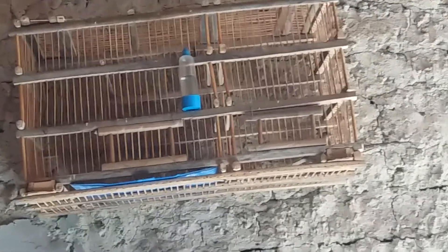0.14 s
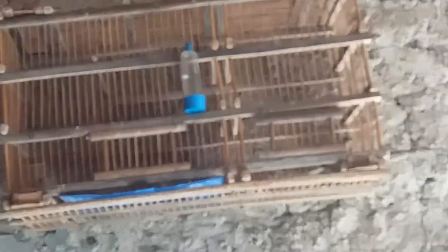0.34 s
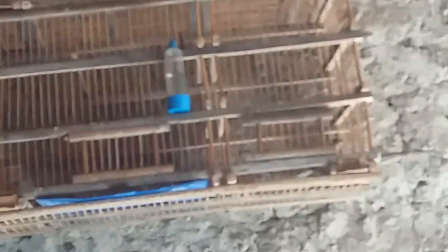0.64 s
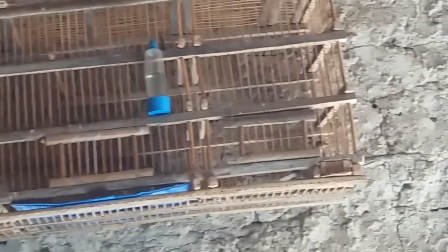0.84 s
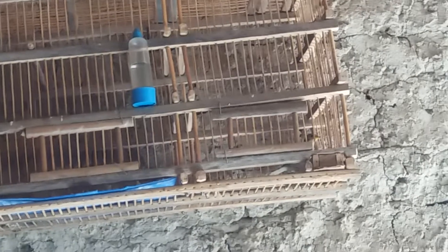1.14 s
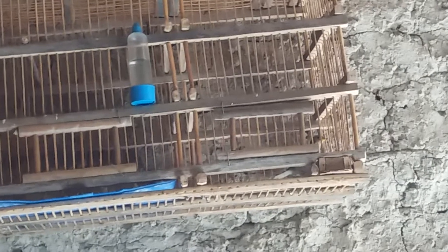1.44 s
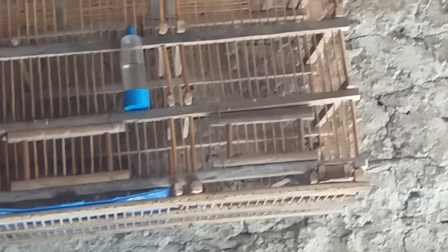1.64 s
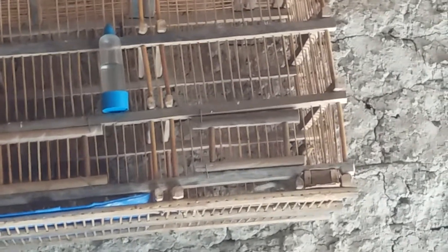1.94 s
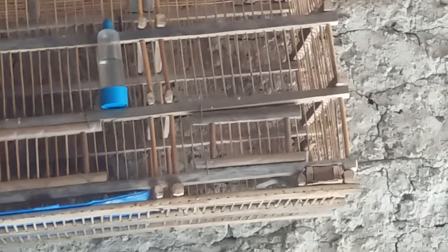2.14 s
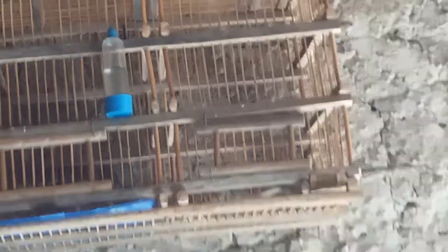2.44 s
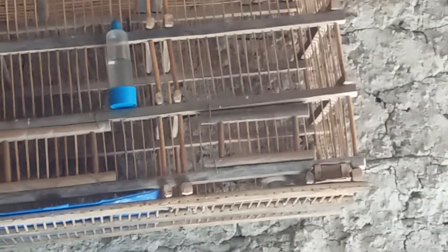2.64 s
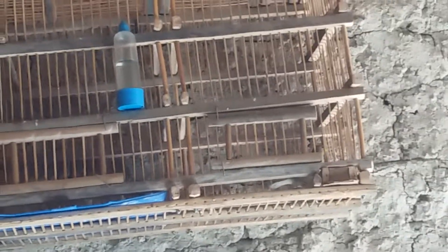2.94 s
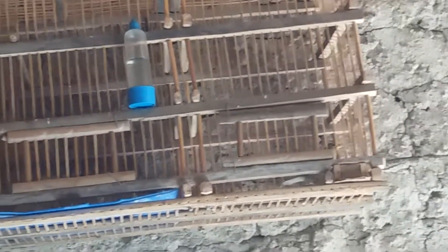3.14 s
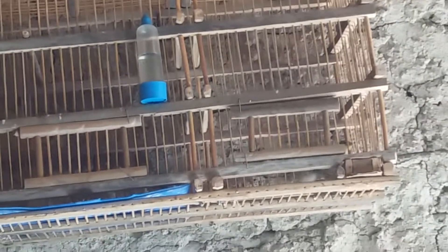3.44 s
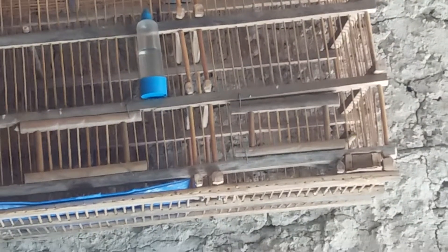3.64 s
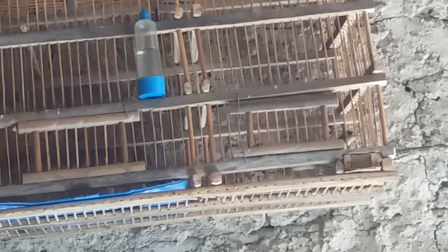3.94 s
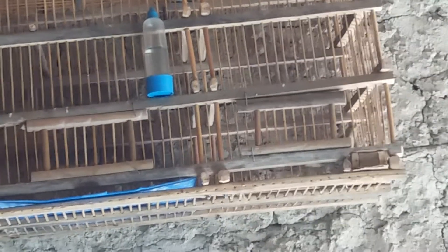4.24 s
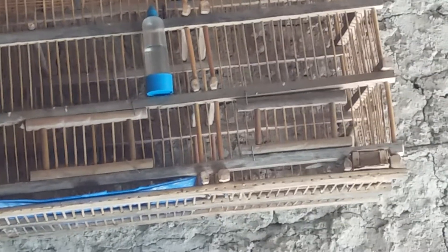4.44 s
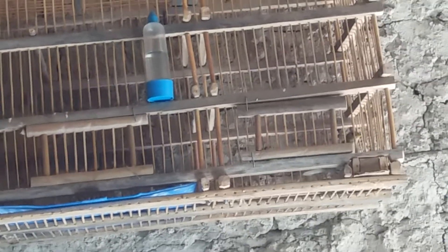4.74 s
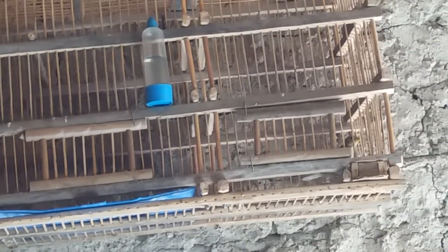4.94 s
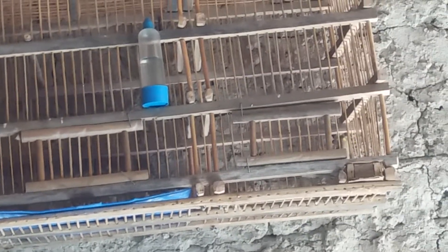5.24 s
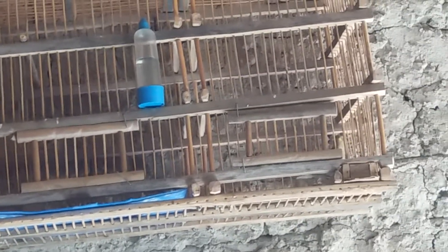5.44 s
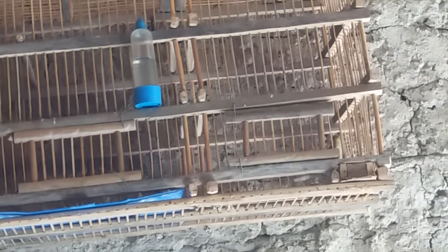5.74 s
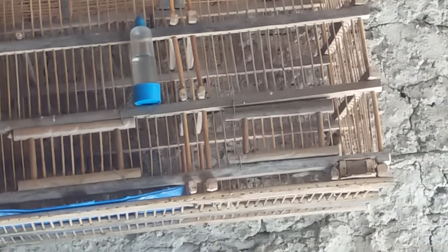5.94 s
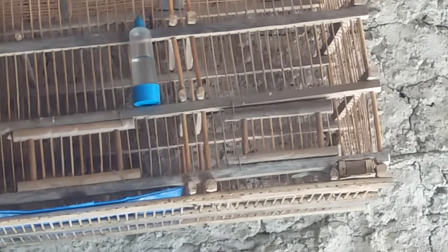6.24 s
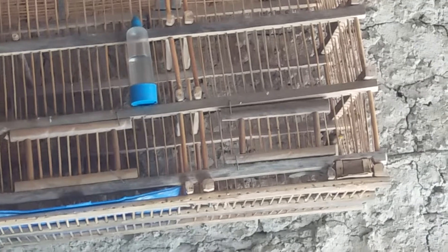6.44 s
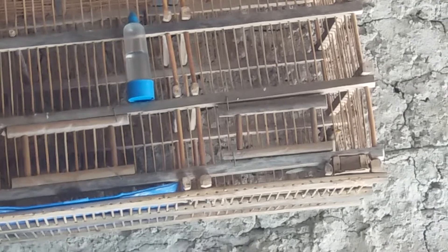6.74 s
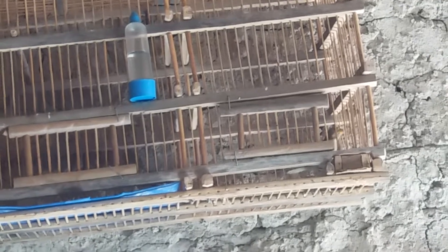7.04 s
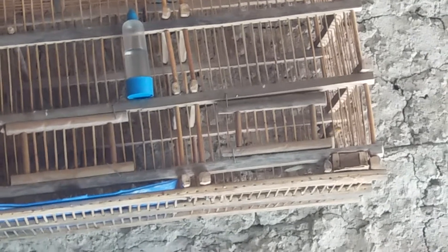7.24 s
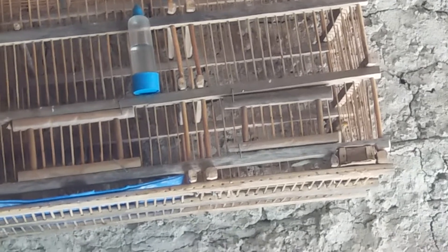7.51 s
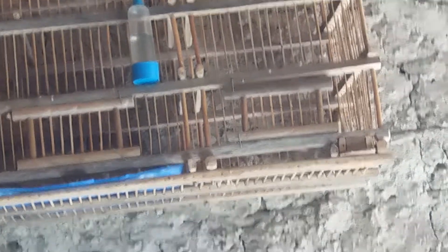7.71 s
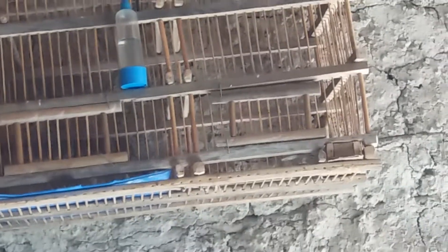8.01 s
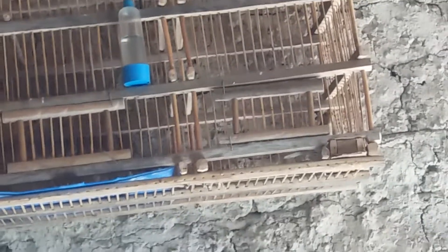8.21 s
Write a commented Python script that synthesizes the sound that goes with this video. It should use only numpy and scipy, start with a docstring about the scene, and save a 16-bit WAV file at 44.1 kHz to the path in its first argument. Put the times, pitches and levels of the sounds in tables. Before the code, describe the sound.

Scattered chirps and light perch ticks build into busy, high twittering from small birds in a wooden cage outdoors.

```python
"""Caged birds twittering

Small birds chip, whistle, then break into overlapping runs of fast twittering. Notes are gliding tones
shaken by a hoarse throat; rasps are clicks ringing its resonances. Cage bars and hard walls smear every
note. Perches tick, a hand bumps the camera, and far chatter, outdoor air and a faint hum lie below."""
import sys
import numpy as np
from scipy import signal
from scipy.fft import rfft, irfft
from scipy.io import wavfile
from scipy.ndimage import uniform_filter1d

SR = 44100
rng = np.random.default_rng(int(sys.argv[2]) if len(sys.argv) > 2 else 0)


def log_audio(samples):
    """Write samples as a 16-bit WAV file to the path given in sys.argv[1]."""
    # one column per channel
    frames = np.atleast_2d(samples).T
    # limit to full scale, then quantise
    limited = np.clip(frames, -1, 1)
    pcm = np.round(limited * 32767).astype(np.int16)
    wavfile.write(sys.argv[1], SR, pcm)


N = 369116


def note(length_s, db, pitches_hz, octave_db=-33, hoarse=0.13):
    """A tone glides through its pitches; a hoarse throat (0-1) shakes pitch and level."""
    n = max(round(length_s * SR), 64)
    knots = len(pitches_hz)
    hz = np.interp(np.linspace(0, knots - 1, n), range(knots), pitches_hz)
    hz = uniform_filter1d(hz, n // (2 * knots), mode="nearest")
    jitter = uniform_filter1d(uniform_filter1d(rng.standard_normal((2, SR // 3)), 30), 30)
    wobble, shimmer = (unit_rms(row)[:n] for row in jitter)
    hz = hz + 700 * hoarse * wobble
    cycles = np.cumsum(hz) / SR
    k = np.arange(1, 9)[:, None]
    rolloff_db = (min(octave_db, 0) - 2) * np.maximum(k - 2, 0) - 7 * (k > 2)
    partial_db = octave_db * (k > 1) + rolloff_db
    # a clear throat damps strong overtones above 6 kHz, a hoarse one passes them
    octaves_over = np.maximum(np.log2(k * abs(hz) / 6000 + 1e-9), 0)
    damp_db = 60 * (1 - hoarse) ** 4 * (octave_db > -20) * (k > 1) * octaves_over
    amps = gain_of(partial_db - damp_db) * np.clip((19000 - k * hz) / 3000, 0, 1)
    partials = (amps * np.sin(2 * np.pi * k * cycles)).sum(0)
    # below 6 kHz alternate cycles differ: a faint line an octave down
    sub = gain_of(-23.5) * np.clip((6000 - hz) / 800, 0, 1) * np.sin(np.pi * cycles + wobble)
    breath = gain_of(-21.5) * uniform_filter1d(rng.standard_normal(SR // 3), 3)[:n]
    flutter = gain_of(8 * min(hoarse, 0.5) * shimmer)
    envelope = signal.windows.tukey(n, min(0.5, 0.034 / length_s))
    return gain_of(db) * (partials + sub + breath) * flutter * envelope


def syllables(rows, path, end_db=-8, **voice):
    """Notes on one evenly timed pitch path; the lower it ends, the more of end_db they reach."""
    out = np.zeros(N)
    for start_s, length_s, db, low_hz, high_hz, *octave_db in rows:
        sound = note(length_s, db, low_hz + (high_hz - low_hz) * np.array(path), *octave_db, **voice)
        ramp_db = end_db * (1 - path[-1]) * np.linspace(0, 1, len(sound)) ** 2
        add(out, start_s, sound * gain_of(ramp_db))
    return out


def slurs():
    """Rough falling notes: hooks flick up first; a second voice holds near the top of each fall."""
    # (start [s], length [s], level [dB], low [Hz], high [Hz])
    falls = [(1.029, 0.12, -64, 3470, 3950), (4.853, 0.026, -34.5, 1327, 5710),
             (4.998, 0.11, -47, 1640, 3450), (5.738, 0.033, -28.5, 3300, 4196),
             (5.853, 0.068, -30, 2314, 5500), (5.988, .06, -34.5, 1436, 2820),
             (6.046, 0.045, -24.5, 3500, 5480), (6.282, 0.081, -24, 2493, 5140),
             (6.344, 0.038, -42, 1190, 3100), (6.698, .035, -24.5, 2350, 4310),
             (6.756, 0.076, -26, 2273, 5245), (7.144, 0.055, -23.5, 3255, 4890),
             (7.223, 0.055, -23, 2830, 4485), (8.087, .03, -53, 6800, 8300),
             (8.282, 0.0503, -24.5, 3124, 4310)]
    hooks = [(5.199, 0.058, -37.5, 4370, 5410), (5.95, 0.047, -28, 2460, 5210),
             (6.189, 0.053, -22.5, 3060, 4830), (6.387, 0.057, -21, 2510, 5240),
             (7.363, 0.035, -28.5, 3030, 3927)]
    # paths (pitch [0 low, 1 high])
    fall = [1, .56, .34, .15, 0]
    hook = [0.73, 0.92, 0.3, 0]
    sag = [1, 0.78, .86]
    second_voice = [(start_s, 0.53 * length_s, db - 5.5, *hz) for start_s, length_s, db, *hz in falls]
    kinds = [(falls, fall), (hooks, hook), (second_voice, sag)]
    return sum(syllables(rows, path, octave_db=-25.5, hoarse=0.28) for rows, path in kinds)


def twitters():
    """Clearer, mostly high notes in six pitch shapes."""
    # (start [s], length [s], level [dB], low [Hz], high [Hz])
    cascades = [(5.935, 0.097, -29, 1814, 8220), (7.257, 0.1, -27, 1786, 8460),
                (7.462, 0.085, -22, 2650, 8220)]  # tumble in two steps
    chips = [(.927, 0.023, -40, 3220, 9200), (3.177, 0.018, -28.5, 4500, 10300),
             (4.359, 0.019, -25, 4210, 10760), (6.229, 0.022, -33.5, 6830, 10450),
             (6.514, 0.027, -30, 5800, 10840), (8.342, 0.017, -34.5, 9000, 10330)]  # rise sharply
    climbs = [(2.383, 0.14, -67.5, 2180, 3810), (5.058, 0.055, -37.5, 2840, 4700),
              (5.727, .028, -30, 3400, 10600), (6.153, 0.037, -39, 7100, 9660),
              (6.473, 0.053, -31.5, 1700, 6490), (7.24, 0.039, -40, 1164, 2660),
              (7.901, 0.039, -35.5, 3166, 4490), (8.248, 0.047, -37.5, 4970, 7370),
              (8.252, 0.058, -42, 5800, 10240)]  # rise ever more slowly
    arches = [(5.927, 0.041, -33, 7200, 10630), (6.681, 0.037, -30.5, 5300, 11070),
              (6.879, 0.053, -26, 3120, 3690), (7.258, 0.033, -33, 5800, 9450),
              (7.457, .035, -34, 6300, 10700), (7.87, 0.057, -32, 2497, 3400)]  # jump, then sag
    dips = [(5.055, 0.075, -40, 5580, 6590), (5.21, 0.051, -33.5, 6220, 7370),
            (8.103, 0.04, -36, 5900, 7200)]  # drop and return
    waves = [(4.778, 0.055, -36, 5120, 7850), (5.743, 0.091, -31.5, 5980, 10600),
             (6.148, .1, -26.5, 6080, 8020), (6.69, 0.094, -26, 5510, 11940)]  # waver, then shoot up
    # paths (pitch [0 low, 1 high])
    cascade = [1, 1, .88, 0.66, .69, 0.32, 0.013, 0.064]
    chip = [0, .45, .56, 1]
    climb = [0, .55, .8, 1]
    arch = [0, 0.93, 0.35]
    dip = [0.95, 0, 1]
    wave = [0, 0.37, .1, 0, .4, 1]
    kinds = [(cascades, cascade), (chips, chip), (climbs, climb),
             (arches, arch), (dips, dip), (waves, wave)]
    return sum(syllables(rows, path, octave_db=-21, hoarse=0.18) for rows, path in kinds)


def swoops():
    """Wide sweeps rich in overtones: up, down and up again."""
    # (start [s], length [s], level [dB], low [Hz], high [Hz])
    sweeps = [(4.717, .125, -36.5, 1773, 5640)]
    loops = [(6.903, .185, -29.5, 1200, 9500)]
    # paths (pitch [0 low, 1 high])
    sweep = [0.0544, 0.091, .22, 0.53, 1, 0.94, 0.132, 0.81]
    loop = [0, .066, .096, .125, .22, .49, .4, .14, .12, .17, .42, .7, 1]
    return syllables(sweeps, sweep, octave_db=-2.5) + syllables(loops, loop, octave_db=-2.5)


def whistles():
    """Near-sine tones of almost level pitch, and a far one that slides down and swells."""
    # (start [s], length [s], level [dB], first [Hz], last [Hz])
    level_notes = [(3.357, 0.19, -50.5, 7660, 7680), (3.367, 0.17, -54, 8860, 9040),
                   (3.374, 0.064, -59, 6800, 7100), (4.961, 0.13, -49.5, 5380, 4950),
                   (5.087, 0.032, -44, 7640, 7960), (5.421, 0.017, -31, 6730, 6740),
                   (5.545, 0.03, -39.5, 3950, 3850), (7.016, 0.017, -29, 4770, 4450),
                   (6.097, 0.085, -33, 3120, 3276), (6.513, 0.037, -31.5, 6810, 6950),
                   (6.557, 0.041, -29.5, 3804, 3780), (7.023, 0.038, -26.5, 3850, 3660),
                   (7.157, 0.0093, -29.5, 5250, 4910), (8.119, 0.12, -26.5, 5124, 4450)]
    # (start [s], length [s], level [dB], low [Hz], high [Hz])
    glides = [(3.96, .275, -63, 2740, 4660)]
    # path (pitch [0 low, 1 high])
    glide = [.9, 1, .76, 0.29, 0.27, 0.021, 0.037]
    out = syllables(glides, glide, end_db=4, hoarse=0.14)
    for start_s, length_s, db, *pitches_hz in level_notes:
        add(out, start_s, note(length_s, db, pitches_hz))
    return out


def calls():
    """Hoarse falling scolds and held or rising calls; the octave may outweigh the fundamental."""
    # (start [s], length [s], level [dB], low [Hz], high [Hz], octave [dB re fundamental])
    scolds = [(1.995, 0.06, -37.5, 1637, 2240, 7), (4.241, .04, -42.5, 1560, 2350, 10.5),
              (4.655, 0.029, -37.5, 1260, 4610, 0.5), (5.679, 0.098, -35.5, 2940, 3324, -13),
              (6.585, 0.1, -26.5, 1540, 4630, -19), (7.082, 0.045, -29, 1515, 5240, -14),
              (7.493, 0.074, -43.5, 1320, 2530, -6), (7.668, 0.073, -39, 1108, 2374, 5), ]
    # path (pitch [0 low, 1 high])
    scold = [0.95, 0.96, 0.42, 0]
    # (start [s], length [s], level [dB], first [Hz], last [Hz], octave [dB], hoarseness [0-1])
    held = [(.0, 0.056, -60, 2620, 2586, 0.5, 0.23), (0.174, 0.089, -40, 2177, 2057, -35, 0.11),
            (1.742, 0.099, -58.5, 2484, 2503, 1, 0.78), (3.603, 0.11, -62, 2405, 2480, -6.5, 0.47),
            (7.387, 0.19, -41, 1914, 2012, 8.5, 0.27), (7.763, 0.1, -36, 1504, 2554, 6.5, 0.1)]
    out = syllables(scolds, scold, hoarse=0.316)
    for start_s, length_s, db, first_hz, last_hz, octave_db, hoarse in held:
        add(out, start_s, note(length_s, db, [first_hz, last_hz], octave_db, hoarse))
    return out


def rasps():
    """Uneven clicks ring a sliding throat resonance and two steady ones."""
    # (start [s], length [s], level [dB], first resonance [Hz], last resonance [Hz])
    buzzes = [(5.318, 0.092, -39.5, 3350, 4360), (5.421, 0.105, -36, 4800, 3760),
              (5.564, 0.059, -35.5, 4640, 3720)]
    clicks_per_s, width_hz = 1100, 2700
    radius = np.exp(-np.pi * width_hz / SR)
    poles = np.convolve([1, -radius], [1, -radius])
    soften = signal.butter(2, 9000, fs=SR, output="sos")
    out = np.zeros(N)
    for start_s, length_s, db, first_hz, last_hz in buzzes:
        n = round(length_s * SR)
        chance, size, sign = rng.random((3, SR // 4))[:, :n]
        heights = gain_of(-4 * np.log(size + 0.0093)) * np.sign(sign - 0.5)
        clicks = signal.sosfilt(soften, (chance < clicks_per_s / SR) * heights)
        carrier = np.exp(2j * np.pi * np.cumsum(np.linspace(first_hz, last_hz, n)) / SR)
        throat = unit_rms((carrier * signal.lfilter([1], poles, clicks / carrier)).real)
        high = gain_of(-2) * unit_rms(resonate_twice(clicks, 8120, width_hz))
        low = gain_of(-3.5) * unit_rms(resonate_twice(clicks, 2070, width_hz))
        add(out, start_s, gain_of(db) * signal.windows.tukey(n, 0.5) * (high + low - throat))
    return out


def nasal_call():
    """Equal harmonics 3-7 of a low pitch pass through one resonance."""
    # (start [s], length [s], level [dB], first [Hz], last [Hz], resonance [Hz], width [Hz])
    nasals = [(0.111, 0.086, -47.5, 619, 592.6, 2350, 1600)]
    out = np.zeros(N)
    for start_s, length_s, db, first_hz, last_hz, nose_hz, width_hz in nasals:
        n = round(length_s * SR)
        cycles = np.cumsum(np.linspace(first_hz, last_hz, n)) / SR
        stack = np.sin(2 * np.pi * np.arange(3, 8)[:, None] * cycles).sum(0)
        tone = resonate_twice(stack, nose_hz, width_hz)
        add(out, start_s, gain_of(db) * signal.windows.tukey(n, 0.5) * tone)
    return out


def perches():
    """Claws and beaks tick: a few milliseconds of noise in a broad wooden resonance."""
    # (time [s], peak [dB], centre [Hz])
    ticks = [(0.136, -45.5, 4960), (0.6245, -37.5, 3570), (1.152, -45.5, 3700), (1.263, -49, 4970),
             (1.647, -47.5, 3420), (1.853, -41, 3520), (2.2724, -44, 3600), (2.679, -45, 4200),
             (2.84, -54.5, 4870), (3.035, -43.5, 2580), (3.7348, -41, 3700), (4.557, -34, 4070),
             (4.582, -46, 4470), (5.1857, -32, 3900)]
    out, t = np.zeros(N), np.arange(600) / SR
    for start_s, db, hz in ticks:
        snap = rng.standard_normal(len(t)) * np.exp(-t / 0.0039)
        tick = resonate_twice(snap, hz, width_hz=2600) + 0.0095 * snap
        add(out, start_s, gain_of(db) * tick / abs(tick).max())
    return out


def bumps():
    """A hand knocks the camera; its body swings a cycle or two, falling in pitch."""
    # (time [s], level [dB])
    knocks = [(0.972, -42.5), (7.864, -31.5), (7.9, -35.5), (7.971, -38)]
    out, t = np.zeros(N), np.arange(1600) / SR
    cycles = 110 * t + 0.3 * (1 - np.exp(-t / 0.001))
    swing = np.sin(2 * np.pi * cycles) * np.exp(-t / 0.005)
    for start_s, db in knocks:
        add(out, start_s, gain_of(db) * swing)
    return out


def far_chatter():
    """Distant birds: short hoarse glides at random."""
    out = np.zeros(N)
    for when, pitch, glide, size in rng.random((160, 4)):
        first_hz = 2000 + 3400 * pitch
        last_hz = first_hz * (0.78 + 0.4 * glide)
        chirp = note(0.056, -73 + 7 * size, [first_hz, last_hz], octave_db=-31, hoarse=0.2)
        add(out, when * N / SR, chirp)
    return out


def air():
    """Outdoor wash with drifting patches and two fuzzy hum lines, all slowly swelling."""
    # wash spectrum (frequency [Hz], relative density [dB])
    spectrum = [(29, -32), (50, -4), (103, -1), (245, -5), (312, -2.5), (436, -3), (480, -3.5), (836, -14),
                (3140, -17), (5080, -26), (7120, -34), (15800, -34)]
    # (time [s], relative level [dB])
    swell = [(0.0, -63.5), (8.37, -58.5)]
    # (frequency [Hz], width [Hz], relative level [dB])
    hum_lines = [(314.4, 6.3, -73.5), (491, 5.6, -71.5)]
    frames, bins_hz = N // 256 + 5, np.fft.rfftfreq(1024, 1 / SR)
    real, imag, patches = rng.standard_normal((frames, 513, 3)).T
    patches_db = 1.6 * unit_rms(uniform_filter1d(uniform_filter1d(patches, 10, 0), 14, 1))
    bins = (real + 1j * imag) * gain_of(curve_at(spectrum, bins_hz)[:, None] + patches_db)
    wash = unit_rms(signal.istft(bins, nperseg=1024, noverlap=768)[1][:N])
    noise = rng.standard_normal(N)
    hum = sum(gain_of(db + 61) * unit_rms(resonate_twice(noise, hz, width_hz))
              for hz, width_hz, db in hum_lines)
    level_db = np.interp(np.arange(N) / SR, *np.transpose(swell)) + 2.5
    return gain_of(level_db) * (wash + hum)


def coloured(x):
    """What beak, cage and microphone pass of a song."""
    # (frequency [Hz], gain [dB])
    response = [(900, -53), (1300, -6), (2100, -5.5), (2700, -1), (3250, 3), (3550, 2), (3900, 4),
                (4500, -0.5), (4950, 3), (5700, -1.5), (6600, -3), (8500, -7), (10500, -7), (16000, -11.5)]
    return irfft(rfft(x) * gain_of(curve_at(response, np.fft.rfftfreq(N, 1 / SR))), N)


def bars(x):
    """Cage bars scatter the direct sound over a few milliseconds."""
    taps = 0.8 * rng.standard_normal(400) * (rng.random(400) < 0.08) * np.exp(-np.arange(400) / 170)
    taps[0] = 1
    return signal.fftconvolve(x, taps / np.linalg.norm(taps))[:N]


def walls(x):
    """Dense echoes whose treble dies first, plus lingering cage tones."""
    # (frequency [Hz], 60 dB decay time [s])
    decay = [(2000, 0.67), (5000, 0.37), (10000, 0.21)]
    # (frequency [Hz], width [Hz], gain [dB])
    cage_modes = [(3220, 9.8, 8.5), (3830, 10.7, 11), (4143, 39, 1)]
    taps = np.zeros(SR // 2)
    slots = np.arange(120, len(taps) - 20, 20)
    taps[slots + rng.integers(0, 20, len(slots))] = rng.choice([-1., 1.], len(slots))
    bins_hz, t, bins = signal.stft(taps, SR, nperseg=128)
    drop_db = -10 / (1 + np.exp((0.06 - t) / 0.027))  # weaker beyond the near walls, 60 ms on
    decay_db = -60 * t / curve_at(decay, bins_hz)[:, None]
    tail = signal.istft(bins * gain_of(drop_db + decay_db), SR, nperseg=128)[1]
    echoes = signal.fftconvolve(x, tail / np.linalg.norm(tail))[:N]
    return echoes + sum(gain_of(db) * resonate(x, hz, width_hz) for hz, width_hz, db in cage_modes)


def resonate(x, hz, width_hz):
    """One resonance, peak gain near 1."""
    radius = np.exp(-np.pi * width_hz / SR)
    return 2 * signal.lfilter([1 - radius], [1, -radius * np.exp(2j * np.pi * hz / SR)], x).real


def resonate_twice(x, hz, width_hz):
    return resonate(resonate(x, hz, width_hz), hz, width_hz)


def gain_of(db):
    return 10 ** (np.asarray(db) / 20)


def unit_rms(x):
    return x / np.sqrt(np.mean(x ** 2) + 1e-20)


def curve_at(points, hz):
    knots_hz, values = np.transpose(points)
    return np.interp(np.log(hz + 1), np.log(knots_hz + 1), values)


def add(mix, start_s, sound):
    part = mix[round(start_s * SR):][:len(sound)]
    part += sound[:len(part)]


def scene():
    """Mono mix; the far birds arrive only as echoes."""
    birds = coloured(twitters() + slurs() + swoops() + whistles() + calls() + rasps() + nasal_call())
    far, ticks = coloured(far_chatter()), perches()
    echoes = gain_of(-3.5) * walls(birds + far + 0.9 * ticks)
    return (gain_of(-2.5) * bars(birds) + ticks + echoes + air() + bumps())[None]


def record(dry):
    """The microphone drops the deepest bass; then the band limit."""
    low_hz, high_hz = 45, 15850
    highpass = signal.butter(3, low_hz, "high", fs=SR, output="sos")
    lowpass = signal.firwin(511, high_hz, window=("kaiser", 9), fs=SR)
    return signal.oaconvolve(signal.sosfilt(highpass, dry), lowpass[None], "same")


dry = scene()
out = record(dry)
log_audio(out)
```